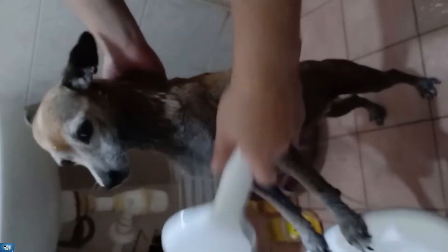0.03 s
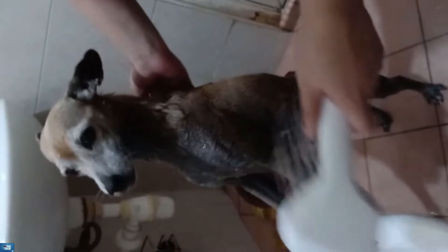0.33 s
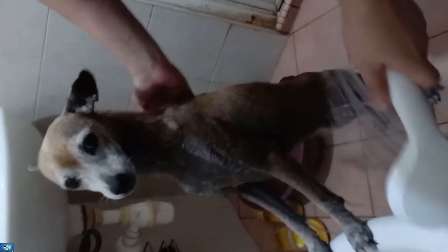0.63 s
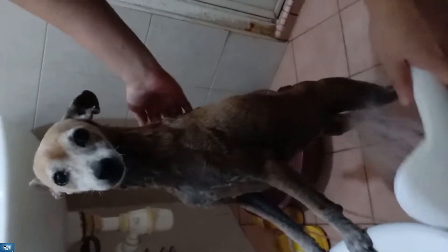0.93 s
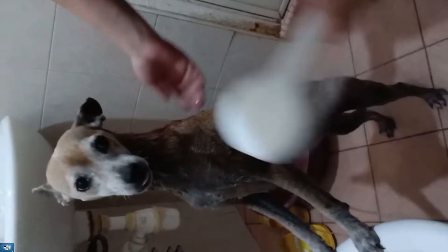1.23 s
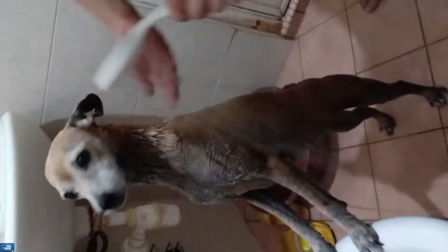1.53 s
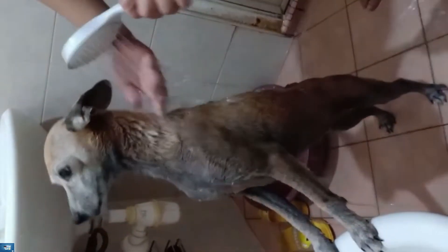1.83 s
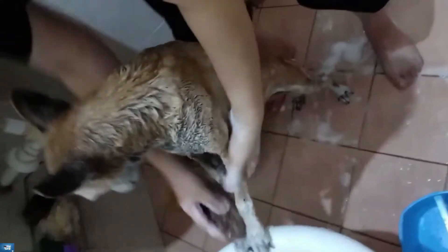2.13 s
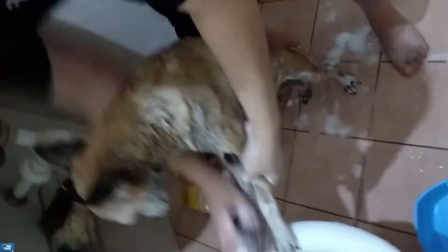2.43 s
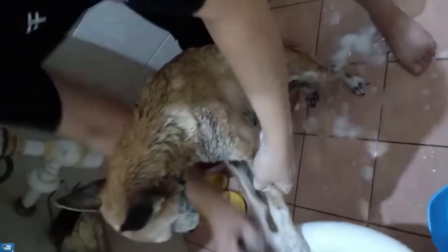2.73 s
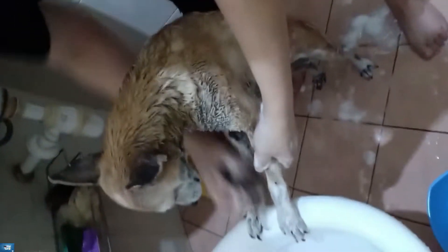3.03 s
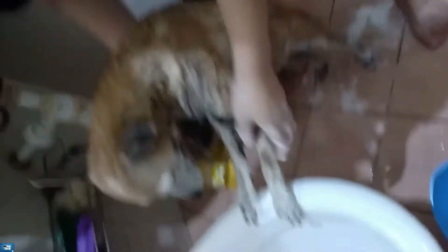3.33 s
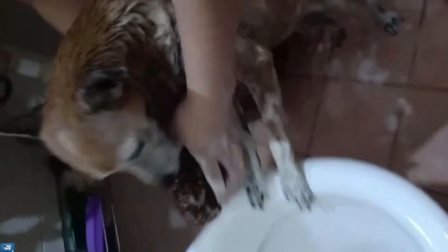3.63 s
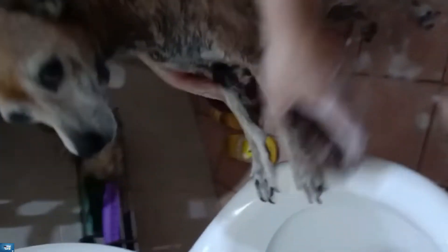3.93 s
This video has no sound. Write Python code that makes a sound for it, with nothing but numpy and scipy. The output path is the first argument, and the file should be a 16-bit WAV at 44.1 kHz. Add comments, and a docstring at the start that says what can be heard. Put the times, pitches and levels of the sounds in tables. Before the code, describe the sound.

A hand shower hisses and drums dully on a dog's coat in a small tiled bathroom, with water splatting on the floor. After a brief silence, hands rub and squelch through soapy fur, close by, over a faint hum.

```python
"""A dog is washed in a small tiled bathroom. First a hand shower booms on its chest, then hisses
on the coat and drums dully, exciting the room's low resonances, while run-off splats on the tiles
and bubbles ping. Just before two seconds the sound cuts to a short silence. A second scene fades
in: hands rub the soapy fur, wet hairs slip and pockets of air squelch, over a low hum and a soft,
hollow hiss."""
import sys
import numpy as np
from scipy import signal
from scipy.fft import rfft, irfft, next_fast_len
from scipy.io import wavfile
from scipy.ndimage import map_coordinates

SR = 44100
rng = np.random.default_rng(int(sys.argv[2]) if len(sys.argv) > 2 else 0)


def dump_mix(stems):
    """Bounce the given channels to the path in sys.argv[1] as a 16-bit WAV at rate SR."""
    frames = np.atleast_2d(stems).T  # one column per channel
    limited = np.clip(frames, -1, 1)  # hard clip at full scale
    pcm = np.round(limited * 32767).astype(np.int16)
    wavfile.write(sys.argv[1], SR, pcm)


N = 176400
T = np.arange(N) / SR


def spray():
    """Superposed impacts make noise: fine drops fizz on the coat, larger ones patter on the floor."""
    # Each row: time in seconds, level of the treble in dB, level of the mids in dB.
    levels = [(0, -40.5, -45), (.2, -42.5, -49), (.3, -45, -43), (.46, -44.5, -43), (.56, -43, -47.5),
              (.64, -40, -47), (.76, -41, -44.5), (.9, -40.5, -43), (1.06, -42, -43.5), (1.16, -41, -43),
              (1.32, -37.5, -44), (1.41, -51.5, -48), (1.5, -38.5, -45), (1.59, -44.5, -40.5),
              (1.73, -52.5, -48), (1.82, -37.5, -44), (1.92, -50, -47)]
    # Spectra of the fine and of the larger drops. Each row: frequency in Hz, relative level in dB.
    fizz_spectrum = [(1500, -37), (3000, -5), (4200, -5.5), (5700, 1.5), (7000, -6.5), (9500, -13.5),
                     (11800, -6.5)]
    patter_spectrum = [(150, -16.5), (400, -16), (800, -3), (1200, -8.5), (1600, -6.5), (1950, 3.5),
                       (2800, 0.5), (3500, -19.5), (6000, -45)]
    treble_db, mids_db = curves(levels)
    fizz = coloured(impacts(per_s=5200, spread_db=1.5), fizz_spectrum)
    fizz *= amp(treble_db + 2.5 + 3 * wobble(35.85))
    patter = coloured(impacts(per_s=2600, spread_db=1.5), patter_spectrum)
    patter *= amp(mids_db + 2.43 * wobble(25))
    return bathroom(fizz + patter, wet_db=-10.5)


def drumming():
    """Forced resonance: the jets drum on the dog and keep the low modes of the small room droning."""
    # Each row: time in seconds, level of the boom in dB, level of the body of the sound in dB.
    levels = [(0, -47, -42.5), (.15, -35.5, -41.5), (.36, -43.5, -44), (.46, -41.5, -45.5),
              (.76, -41.5, -40.5), (.95, -46.5, -45.5), (1.2, -46, -45), (1.4, -46, -46.5),
              (1.57, -41.5, -44), (1.64, -50, -51), (1.70, -41, -40.5), (1.77, -47, -44.5),
              (1.84, -37.5, -41), (1.91, -40.5, -44)]
    # The two strongest resonances swell in turn.
    # Each row: time in seconds, level of the lower in dB, level of the upper in dB.
    pair_levels = [(0.0, -62, -45), (0.104, -49, -45.5), (0.56, -59, -50.5), (0.612, -47.5, -49.5),
                   (1.238, -52, -47), (1.338, -44.5, -66), (1.376, -49, -49), (1.66, -49.5, -54),
                   (1.698, -50, -37), (1.746, -56, -51), (1.824, -38.5, -47), (1.9, -55.5, -62)]
    # Room modes. Each row: frequency in Hz, bandwidth in Hz, relative level in dB.
    boom_modes = [(121.6, 8.8, -5), (134.8, 11, 1), (146.7, 14, -5), (185.3, 12, -5), (221, 7.8, -5)]
    body_modes = [(273, 43, -3), (326, 14, -6.5), (364.7, 10, -5), (399, 29, 0), (439.5, 8, -1),
                  (534, 8.9, 0), (751, 20, -4.5), (867, 70, -1), (920, 35, 0)]
    lower_modes, upper_modes = [(457, 7.9, 0)], [(498.8, 5.4, -3.5), (510.6, 8.2, -6.5)]
    # The unpitched part of the drumming. Each row: frequency in Hz, relative level in dB.
    thud_spectrum = [(60, -22.5), (110, 1.5), (250, 3), (560, 3), (680, -6.5), (950, -9), (1600, -29.5)]
    boom_db, body_db = curves(levels)
    lower_db, upper_db = curves(pair_levels)
    thud = amp(0.5) * coloured(impacts(per_s=1500, spread_db=4), thud_spectrum)
    pair = droning(lower_modes) * amp(lower_db + 1) + droning(upper_modes) * amp(upper_db + 1)
    boom = droning(boom_modes) * amp(boom_db - 1.5)
    body = (droning(body_modes) + thud) * amp(body_db - 5)
    return boom + body + pair


def chest(hz=177.3, width_hz=14, until_s=0.16, fade_s=0.05):
    """A driven resonance booms at first, while the jets play on the dog's ribcage."""
    fade = (1 - np.tanh((T - until_s) / fade_s)) / 2
    return amp(-35) * fade * droning([(hz, width_hz, 0)])


def splats(rise_s=0.0007, smack_s=0.0029):
    """Impact breaks each lump of water on the tiles: a smack, then exponentially fading droplets."""
    # Each row: start in seconds, level in dB, pitch in Hz, width in octaves, decay time in seconds.
    lumps = [(0.101, -34, 4300, 0.4, 0.017), (0.321, -26.5, 5470, 0.13, 0.0066),
             (0.327, -28, 5400, 0.16, 0.0069), (0.335, -34, 5500, .17, 0.015),
             (0.403, -34, 4100, 0.4, 0.037), (0.546, -34.5, 5650, 0.13, 0.017),
             (0.684, -38.5, 2050, 0.19, 0.036), (0.709, -31, 4230, 0.24, 0.03),
             (0.741, -32.5, 5130, 0.11, 0.022), (0.761, -29, 5000, 0.1, 0.01),
             (0.814, -32.5, 5050, 0.18, 0.047), (0.866, -30, 5150, 0.15, 0.011),
             (0.934, -22.5, 2713, 0.13, 0.013), (0.944, -32, 2830, 0.19, 0.027),
             (0.94, -34.5, 5440, 0.23, 0.029), (0.992, -29, 4840, 0.15, 0.015),
             (1.143, -38, 5400, 0.3, 0.027), (1.24, -43, 5800, 0.1, 0.053), (1.521, -32, 5030, 0.22, 0.02),
             (1.757, -37.5, 877, 0.077, 0.021), (2.702, -40, 4980, 0.1, 0.01),
             (3.702, -47, 2400, 0.19, 0.018)]
    out = np.zeros(N)
    for start, db, hz, octaves, decay_s in lumps:
        age = np.maximum(T - start, 0)
        attack = 1 - np.exp(-age / rise_s)
        burst = np.exp(-age / decay_s) + amp(-19.5) * np.exp(-age / smack_s)
        droplets = band(impacts(per_s=2700, spread_db=1.5), hz, octaves)
        out += amp(db + 2.5) * attack * burst * droplets
    return bathroom(out, wet_db=-8)


def rubbing():
    """Friction: under each stroke of the hand countless wet hairs slip and foam crackles."""
    # Each row: time of the peak in seconds, level in dB, rise in seconds, fall in seconds.
    strokes = [(2.28, -40.5, 0.24, 0.043), (2.405, -41.5, 0.029, 0.042), (2.55, -40, 0.019, 0.03),
               (2.61, -41.5, 0.026, 0.047), (2.897, -37.5, 0.042, 0.054), (3.085, -46.5, .018, 0.044),
               (3.171, -40.5, 0.016, 0.065), (3.232, -41.5, 0.038, 0.029), (3.72, -51.5, 0.073, 0.067),
               (3.82, -50, 0.045, 0.068), (4, -59.5, 0.037, .05)]
    # Spectrum of rubbed wet fur. Each row: frequency in Hz, relative level in dB.
    fur_spectrum = [(150, -15), (400, -11), (660, -0.5), (1100, -3), (1400, -2.5), (2000, -0.5),
                    (2700, -0.5), (3500, -8.5), (5600, -2), (7000, -12.5), (8500, -27.5), (12000, -21)]
    power = np.zeros(N)
    for peak, db, rise, fall in strokes:
        power += amp(2 * db) * np.exp(-((T - peak) / np.where(T < peak, rise, fall)) ** 2)
    hairs = coloured(impacts(per_s=5000, spread_db=2.5), fur_spectrum)
    return bathroom(hairs * np.sqrt(power) * amp(-1 + 1.4 * wobble(45)), wet_db=-10.5)


def squelches(fall_over_rise=1.14):
    """Cavity resonance: water pressed through the coat sets small air pockets ringing briefly."""
    # Each row: time of the peak in seconds, level in dB, pitch in Hz, width in octaves, rise in seconds.
    pockets = [(0.072, -35.5, 1320, 0.55, 0.016), (0.303, -41.5, 1210, 0.63, 0.046),
               (2.39, -50, 2400, 0.14, 0.019), (2.556, -47, 2020, 0.13, 0.026),
               (2.6, -46.5, 2380, 0.042, 0.023), (2.645, -55, 806, 0.2, 0.04),
               (2.749, -46, 2060, 0.2, 0.017), (3.084, -48, 2450, 0.05, 0.013),
               (3.088, -43.5, 910, 0.088, 0.015), (3.108, -48, 1110, 0.09, .014),
               (3.11, -50, 1850, .12, 0.012), (3.16, -46, 1770, 0.082, .016),
               (3.243, -51.5, 655.3, 0.022, 0.02), (3.252, -49, 1305, 0.056, 0.024),
               (3.253, -47, 2420, 0.12, 0.025), (3.34, -48, 2310, .05, 0.021),
               (3.36, -58, 1480, 0.045, 0.01), (3.473, -52.5, 1500, 0.06, 0.027),
               (3.585, -51.5, 1470, 0.057, 0.012), (3.635, -54, 1100, 0.06, 0.015),
               (3.737, -51, 1570, 0.12, 0.022), (3.97, -47, 1360, 0.31, 0.021)]
    out = np.zeros(N)
    for peak, db, hz, octaves, rise in pockets:
        spread_s = rise * np.where(T < peak, 1, fall_over_rise)
        swell = np.exp(-0.5 * ((T - peak) / spread_s) ** 2)
        ring = band(impacts(per_s=1800, spread_db=1), hz, octaves)
        out += amp(db) * swell * evened(ring, share=0.36)
    return bathroom(out, wet_db=-5)


def bubbles(per_s=120, centre_hz=2602, range_octaves=2.4, range_db=26, decay_cycles=19, glide=0.076):
    """Bubbles in the water on the floor ping as damped oscillators, each rising a little in pitch."""
    out = np.zeros(N + SR)
    t = np.arange(SR // 20) / SR
    for when, pitch, size in rng.random((int(per_s * N / SR), 3)):
        cycles = centre_hz * 2 ** (range_octaves * (pitch - 0.5)) * t
        decay = cycles / decay_cycles
        ping = np.exp(-decay) * np.sin(2 * np.pi * cycles * (1 + glide * decay / 2))
        out[int(when * N):][:len(t)] += amp(range_db * size) * ping
    return amp(-55.5) * unit(bathroom(out[:N], wet_db=-3.5))


def hollow():
    """Resonant filtering: a few fixed modes give a soft hiss a hollow ring."""
    # Each row: time in seconds, level of the ring in dB.
    levels = [(2.1, -43), (2.45, -51), (2.7, -60), (2.95, -52), (3.05, -53.5), (3.14, -53), (3.26, -49.5),
              (3.4, -56), (3.75, -57.5), (4, -74)]
    # Each row: frequency in Hz, bandwidth in Hz, level in dB before the treble is rolled off.
    modes = [(645, 35, -6.5), (911, 42, -2), (1318, 65, 1), (1452, 66, -1.5), (1799, 35, 1), (1990, 48, -5),
             (2377, 43, 4.5), (2730, 41, -14.5)]
    level_db, = curves(levels)
    ring = ringing(impacts(per_s=4000, spread_db=0.5), modes)
    dulled = coloured(ring, [(250, 7), (600, -7), (2900, -10.5), (4500, -37)])
    return dulled * amp(level_db + 3.4 * wobble(17))


def background(drone_hz=68.4):
    """Slow amplitude and phase modulation makes a hum waver under a wet hiss and a faint rumble."""
    # Spectrum of the hiss. Each row: frequency in Hz, relative level in dB.
    hiss_spectrum = [(59, -43.5), (100, -8), (125, -11.5), (155, -3.5), (415, -1.5), (595, -8.5),
                     (727, -8.5), (1520, -8), (2100, -6.5), (6200, -16.5), (12000, -31), (15600, -59.5),
                     (22000, -120)]
    # The deepest tone of the hum. Each row: time in seconds, level in dB.
    drone_levels = [(2.1, -65), (2.6, -66.5), (3.2, -65), (4, -63.5)]
    # The higher tones of the hum. Each row: frequency in Hz, level in dB.
    partials = [(124, -69), (188, -68), (307, -68), (522, -67), (646, -77.5)]
    hiss = coloured(impacts(per_s=4000, spread_db=2), hiss_spectrum)
    hiss = unit(bathroom(hiss, wet_db=-1.5)) * amp(-54.5 + 0.77 * wobble(8))
    drone_db, = curves(drone_levels)
    hum = amp(drone_db) * np.sin(2 * np.pi * drone_hz * T + 0.15 * wobble(4))
    for hz, db in partials:
        hum += amp(db + 1.8 * wobble(1.7)) * np.sin(2 * np.pi * hz * T + 0.65 * wobble(5.4))
    rumble = coloured(rng.standard_normal(N), [(20, -3), (50, -5), (90, -5), (200, -12), (1000, -60)])
    return hiss + np.sqrt(2) * hum + amp(-73) * rumble


def bathroom(x, wet_db):
    """Reverberation: reflections from the tiles follow the direct sound and decay exponentially."""
    # Each row: frequency in Hz, time to decay by 60 dB in seconds.
    decay_times = [(120, 0.18), (500, 0.56), (2500, 0.31), (6000, 0.56), (12000, 0.2)]
    hz, t, noise = signal.stft(rng.standard_normal(SR // 2), SR, nperseg=256)
    decay = amp(-60 * t / along(decay_times, hz)[:, None])
    _, tail = signal.istft(noise * decay, SR, nperseg=256)
    response = np.pad(tail, (130, 0)) / np.linalg.norm(tail)  # reflections arrive 3 ms late
    echo = signal.fftconvolve(x, response)[:N]
    return (x + amp(wet_db) * echo) / np.hypot(1, amp(wet_db))


def impacts(per_s, spread_db):
    """Shot noise: tiny impacts at random times with random sizes, at rms 1."""
    size = amp(spread_db * np.minimum(rng.exponential(size=N), 5)) * rng.choice([-1, 1], N)
    return unit(size * (rng.random(N) < per_s / SR))


def droning(modes):
    """Steady random forcing sustains each mode as a narrow band of noise; the sum has rms 1."""
    hz = np.fft.rfftfreq(N, 1 / SR)
    out = np.zeros(N)
    for centre, width, db in modes:
        resonance = 1 / (1 + (2 * (hz - centre) / (width + 1)) ** 2)
        tone = irfft(rfft(rng.standard_normal(N)) * resonance, N)
        out += amp(db) * evened(tone, share=0.65)
    return unit(out)


def ringing(x, modes):
    """Second-order resonators respond to x in parallel; the sum has rms 1."""
    def response(f):
        return sum(amp(db) * 1j * f * width / (hz * hz - f * f + 1j * f * width)
                   for hz, width, db in modes)
    return unit(filtered(x, response))


def band(x, hz, octaves):
    """Band-pass filtering by one resonance, at rms 1."""
    return unit(filtered(x, lambda f: 1 / (1 + 1j * np.log2((f + 1) / hz) / (2 * octaves)) ** 3))


def coloured(x, spectrum):
    """Spectral shaping by a curve of (Hz, dB) points, at rms 1."""
    return unit(filtered(x, lambda hz: amp(along(spectrum, hz))))


def filtered(x, response):
    """Linear filtering multiplies the spectrum of x by a frequency response."""
    size = next_fast_len(N + SR // 2)
    return irfft(rfft(x, size) * response(np.fft.rfftfreq(size, 1 / SR)), size)[:N]


def evened(x, share):
    """Envelope compression smooths away a share of the chance swells and dips, at rms 1."""
    envelope = np.abs(signal.hilbert(unit(x)))
    return unit(x / (envelope + 0.11) ** share)


def wobble(per_s):
    """Smooth random modulation: a spline through per_s random values a second."""
    return map_coordinates(rng.standard_normal(int(N * per_s / SR) + 4), [T * per_s])


def curves(rows):
    """Linear interpolation in time of each column after the first."""
    times, *columns = np.transpose(rows)
    return [np.interp(T, times, column) for column in columns]


def along(points, hz):
    """Interpolation of (Hz, value) points on a logarithmic frequency axis."""
    frequencies, values = np.transpose(points)
    return np.interp(np.log(hz + 1), np.log(frequencies + 1), values)


def amp(db):
    """Decibels as an amplitude ratio."""
    return 10 ** (np.asarray(db) / 20)


def unit(x):
    """Normalisation to rms 1."""
    return x / np.sqrt(np.mean(x ** 2) + 1e-20)


def scene(silence_from_s=1.922, silence_until_s=2.103, cut_s=0.02, fade_s=0.34):
    """The sources superpose in two scenes: the shower, then after a silence the soaping."""
    cut_off = np.clip((silence_from_s - T) / cut_s, 0, 1)
    fade_in = np.clip((T - silence_until_s) / fade_s, 0, 1) ** 1.35
    shower = spray() + drumming() + chest() + bubbles()
    common = splats() + squelches() + background()
    soaping = rubbing() + hollow()
    return (cut_off * (shower + common) + fade_in * (soaping + common))[None]


def record(dry):
    """Band limiting: a steep low-pass filter removes the highest treble."""
    cutoff_hz = 12150
    return filtered(dry[0], lambda hz: 1 / (1 + (hz / cutoff_hz) ** 150))[None]


dry = scene()
out = record(dry)
dump_mix(out)
```